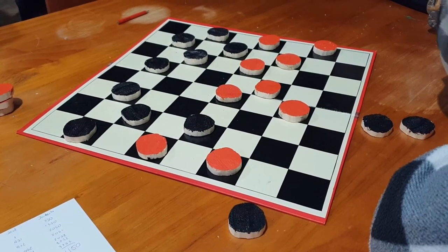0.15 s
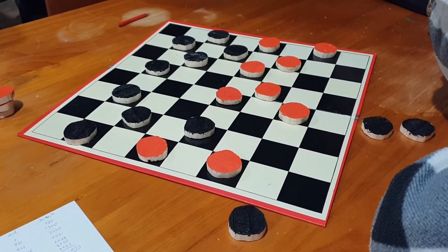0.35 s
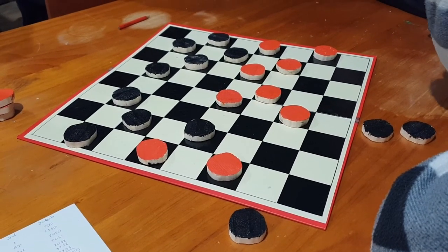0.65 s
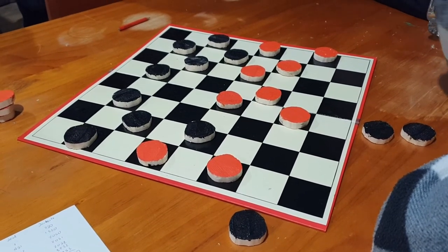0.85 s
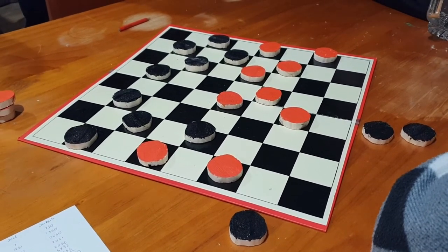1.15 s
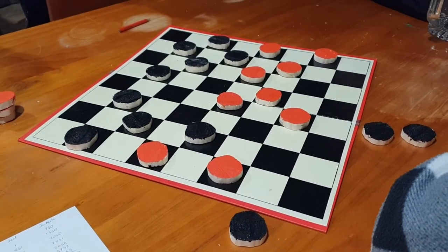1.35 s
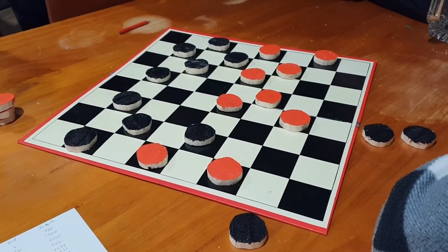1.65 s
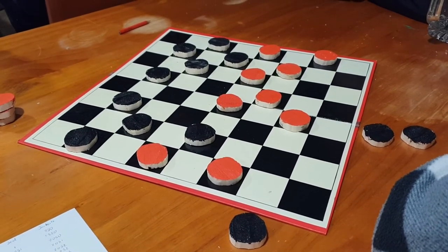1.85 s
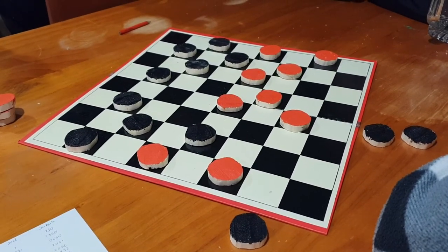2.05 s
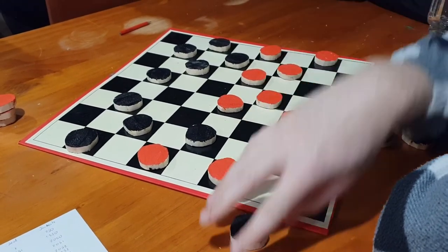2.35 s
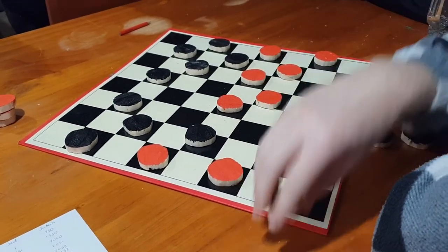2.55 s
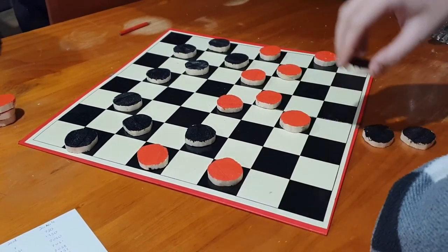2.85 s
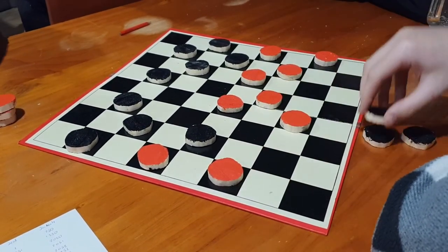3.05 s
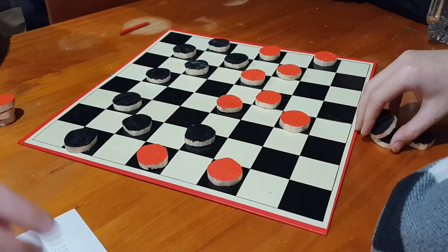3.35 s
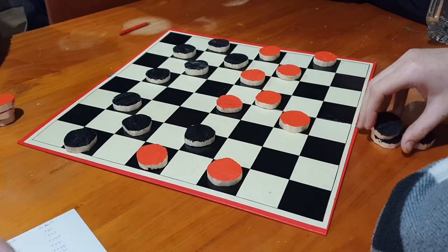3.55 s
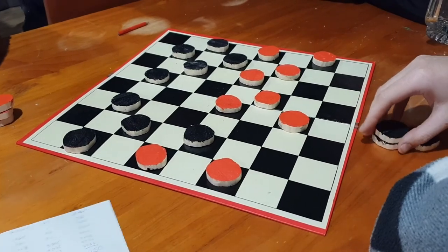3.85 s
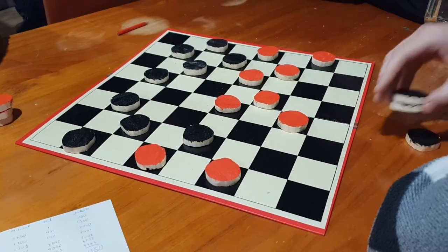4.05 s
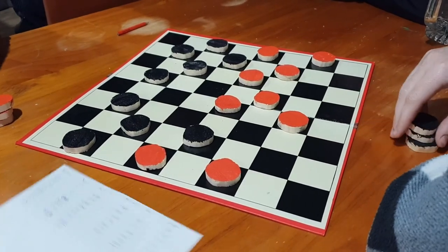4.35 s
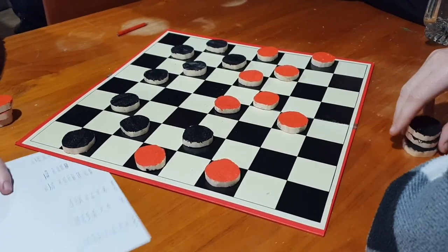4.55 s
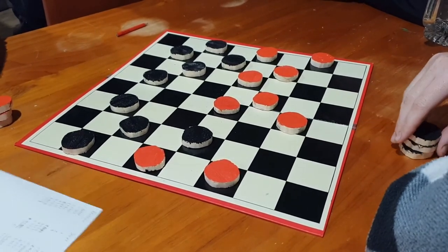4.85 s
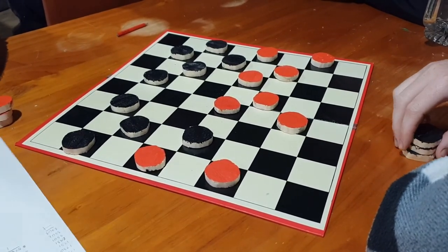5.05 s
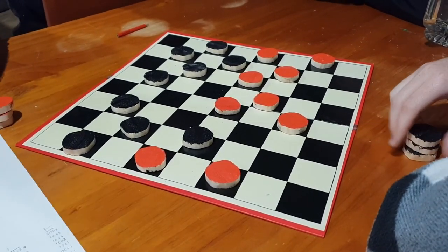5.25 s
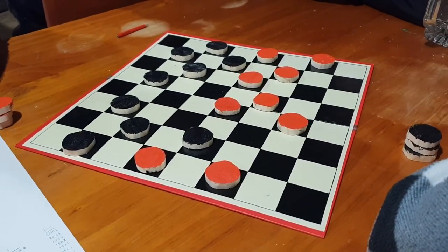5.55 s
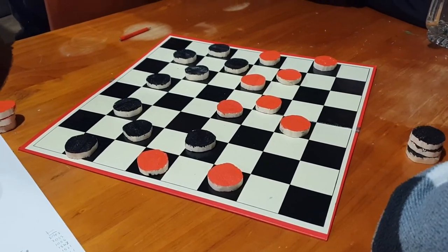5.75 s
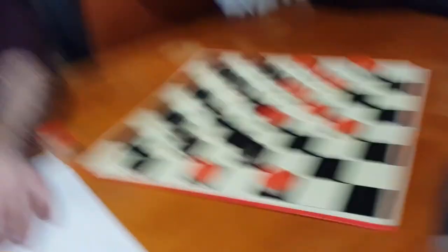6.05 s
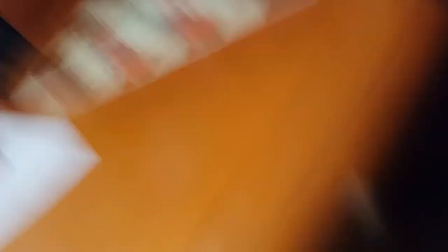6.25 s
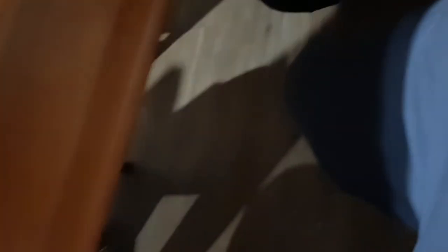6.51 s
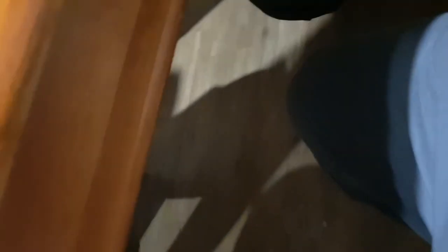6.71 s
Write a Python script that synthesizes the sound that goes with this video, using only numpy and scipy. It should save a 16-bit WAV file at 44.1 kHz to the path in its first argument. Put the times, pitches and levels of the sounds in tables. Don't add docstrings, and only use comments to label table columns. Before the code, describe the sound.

Small wooden game pieces knock together and are stacked indoors, a stiff sheet snaps and rustles, and fingers bump and rub the recorder.

```python
import sys
import numpy as np
from scipy import signal
from scipy.fft import rfft, irfft
from scipy.io import wavfile
from scipy.ndimage import uniform_filter1d

SR = 44100
rng = np.random.default_rng(int(sys.argv[2]) if len(sys.argv) > 2 else 0)


def field_ratio(decibels):
    return 10 ** (np.asarray(decibels, dtype=float) / 20)


def master_out(mix):
    frames = np.transpose(np.atleast_2d(mix))
    ceiling = np.clip(frames, -1, 1)
    pcm = np.round(ceiling * 32767).astype(np.int16)
    wavfile.write(sys.argv[1], SR, pcm)


N = 303408

# (time [s], peak level [dB], ring [Hz], crack level [dB])
FIDGET = [(0.036, -31, 2620, -28), (0.0817, -9.5, 3140, -22.5), (0.2091, -23, 3600, -35),
          (0.2142, -17, 3600, -34), (0.254, -30, 3700, -43), (0.3299, -24.5, 2400, -39),
          (0.3421, -24, 2960, -45), (0.351, -23.5, 3350, -31), (0.3655, -22.5, 2620, -36),
          (0.3736, -10.5, 3660, -30), (0.3878, -20, 6000, -32), (0.4036, -32, 2130, -45),
          (0.4146, -25, 2700, -40), (0.4278, -22.5, 2680, -13), (0.4508, -16, 5520, -39),
          (0.4335, -30, 2400, -45), (0.4549, -32, 5400, -40), (0.4607, -23, 5640, -43),
          (0.4645, -28, 5460, -47), (0.4682, -24, 5800, -37), (0.474, -25, 4950, -40),
          (0.4859, -29, 3000, -42), (0.4772, -20.5, 3580, -24), (0.509, -28, 5800, -38),
          (0.5308, -22.5, 5300, -38), (0.618, -7, 2800, -27), (0.839, -28, 3430, -36),
          (0.8927, -35, 3300, -50), (0.925, -36, 4260, -41), (0.97, -24.5, 2300, -38),
          (0.981, -32, 2200, -10), (0.0875, -48, 2900, -30), (1.5971, -33, 3260, -41),
          (1.167, -27.5, 5100, -31), (1.62, -29, 3900, -37), (1.699, -36, 5130, -36),
          (1.735, -31.5, 3890, -50), (1.74, -33, 5100, -38), (1.8818, -27.5, 4330, -37),
          (1.8956, -33.5, 4570, -35), (2.0717, -35, 2950, -47), (2.0939, -32, 3370, -42),
          (2.065, -30, 3640, -42), (2.1026, -28, 3870, -40)]
# (time [s], peak level [dB], ring [Hz], crack level [dB])
STACKING = [(2.692, -45, 5530, -29), (2.7055, -13, 5560, -33), (2.697, -43, 5650, -30),
            (2.7355, -17, 6000, -39), (2.739, -20, 6000, -41), (2.7455, -13.5, 3900, -52),
            (2.755, -12, 6040, -25), (2.7613, -9.5, 3670, -59), (2.7671, -10, 3900, -55),
            (2.771, -24, 3120, -45), (2.7784, -15.5, 3650, -26), (2.7827, -14.5, 3800, -47),
            (2.7865, -19, 4080, -45), (2.7983, -26, 3850, -42), (3.891, -34, 4870, -53),
            (4.2504, -30, 5030, -20), (4.264, -28, 5470, -23), (4.3231, -14, 5700, -31),
            (4.341, -27, 4670, -23), (4.348, -29, 4140, -35), (4.355, -27, 4850, -35),
            (4.4142, -29, 4970, -35), (4.3766, -16, 4700, -48), (4.3914, -17.5, 4150, -24.5),
            (4.409, -26, 5530, -33)]
FIDGET_PAN_DB, STACK_PAN_DB, PAN_DB_PER_OCTAVE = 4, 0, -5.5
HOLLOW_HZ, HOLLOW_DB, HOLLOW_T60_S = 2690, -33.5, 0.54

# (time [s], peak level [dB], ring [Hz], edge level [dB])
KNOCKS = [(0.08, -28, 444, 2), (0.21, -23, 1730, 16.5), (0.331, -31, 1800, -36), (0.374, -20.5, 1700, 7.5),
          (0.478, -29.5, 1720, 13), (0.97, -27, 1260, 14), (1.638, -32, 754, -9), (2.1, -36, 1420, -28),
          (2.443, -31.5, 810, -14.5), (2.52, -40.5, 1380, -36), (2.764, -22.5, 1700, 12),
          (2.774, -26, 520, -20), (3.03, -32, 690, -3.5), (3.103, -22.5, 1800, 4.5),
          (3.118, -29.5, 700, -22), (3.6225, -19, 1210, 0), (3.6453, -23, 525, -41),
          (3.873, -32, 1370, -13), (4.028, -30, 606, -12), (4.126, -33.5, 595, -32), (4.199, -17, 800, -9),
          (4.555, -33, 593, -30), (4.585, -28, 970, -33), (4.674, -34, 1630, -21), (4.9, -30, 1750, -18),
          (5.197, -36.5, 745, -19), (5.465, -22.5, 1180, 1), (5.671, -43.5, 900, -43)]
# (time [s], peak level [dB], ring [Hz])
BUMPS = [(0.099, -40.5, 48), (0.642, -36.5, 57.6), (1.08, -34, 111), (1.203, -36, 128), (2.39, -33, 172),
         (2.62, -34.5, 374), (3.653, -32.5, 197), (4.132, -32.5, 194), (4.47, -29.5, 135), (4.58, -33, 136),
         (5.066, -29, 293), (5.194, -35, 101), (5.464, -28, 400), (5.523, -25.5, 181), (5.765, -30, 135)]
# (frequency [Hz], level [dB], t60 [s])
BOARD_MODES = [(603, -12.5, 0.08), (750, -0.5, 0.04), (1010, -13, 0.11), (1448, 0.5, 0.081),
               (1700, -1.5, 0.073), (1965, -2, 0.029), (2800, 7.5, 0.023), (3600, 17.5, 0.059)]
BOARD_DB, BOARD_TILT_DB = -17.5, 11
# (time [s], shuffle level [dB], hold [s])
SHUFFLE = [(0.0, -48.5, 0.014), (0.25, -54, 0.0088), (0.375, -42, 0.01), (0.42, -46, 0.088),
           (0.66, -50.5, 0.22), (0.85, -48.5, 0.36), (1.15, -45.5, 0.13), (1.645, -45, 0.071),
           (2.105, -51, 0.0025), (2.78, -42, 0.0027), (3.13, -42, 0.0034)]
PUSH_RISE_DB_S, PUSH_FALL_DB_S = 167, 175
# (frequency [Hz], level [dB per Hz])
SHUFFLE_COLOUR = [(500, -1.5), (900, -3.5), (1400, -1.5), (3200, -8), (6000, -17.5), (10000, -67)]

# (time [s], peak level [dB], ring [Hz])
SNAPS = [(4.5027, -26.5, 5500), (4.582, -31, 4400), (4.6016, -46, 4180), (4.656, -20, 6060),
         (4.6653, -21, 6130), (4.675, -14.5, 5600), (4.6837, -44, 4860), (4.689, -25, 5800),
         (4.693, -23, 4080), (4.7027, -40, 5000), (4.8052, -25, 4900), (4.814, -27, 5700),
         (4.8305, -15.5, 5500), (4.851, -18, 4300), (4.8715, -34, 3630), (4.8808, -16, 4870),
         (4.8936, -16, 5000), (4.9006, -4.5, 3930), (4.9065, -2.5, 4160), (4.912, -10, 3330),
         (4.919, -14, 3380), (4.9239, -26, 3400), (4.9285, -44, 3350), (5.0284, -27, 4050),
         (5.0418, -17, 3930), (5.047, -28, 3600), (5.0526, -14.5, 3200), (5.062, -27, 3130),
         (5.068, -43, 3400), (5.0893, -4, 4700), (5.0945, -4.5, 4800), (5.101, -7.5, 6050),
         (5.106, -13, 5900), (5.12, -36, 4200), (5.124, -14.5, 4200), (5.1342, -23, 4200),
         (5.1423, -18.5, 5400), (5.1506, -17, 4860), (5.1602, -22, 4600), (5.169, -30, 5900),
         (5.173, -16.5, 4260), (5.1788, -19, 5100), (5.1886, -21.5, 5140), (5.2488, -24.5, 4500),
         (5.279, -23, 4530), (5.306, -23.5, 6850), (5.323, -19.5, 4970), (5.331, -32, 5900),
         (5.344, -28, 4950), (5.3513, -12, 4860), (5.3571, -13, 4900), (5.3648, -12.5, 4750),
         (5.3765, -26, 4900), (5.398, -28, 5030), (5.411, -37, 4750),
         (5.455, -36, 5050), (5.4584, -24, 5000), (5.4671, -27, 8000), (5.4864, -17.5, 3600),
              (5.495, -13.5, 5000), (5.5, -21, 3670), (5.5228, -22, 3780), (5.5323, -25, 6400),
              (5.5386, -23, 5460), (5.5443, -16.5, 5440), (5.5475, -21, 5500), (5.5518, -11, 3300),
              (5.562, -15, 5560), (5.567, -13, 5700), (5.574, -17.5, 5600), (5.5814, -18, 5660),
              (5.5885, -10.5, 5040), (5.5935, -23, 4780), (5.701, -27, 5370), (5.7135, -21.5, 5940),
              (5.7318, -22, 5850), (5.747, -25, 5370), (5.763, -34, 5470), (5.7745, -29.5, 5900),
              (5.783, -15, 5550), (5.7914, -14, 5070), (5.793, -8, 4400), (5.807, -25, 5300),
              (5.8148, -11, 4130), (5.821, -21, 7900), (5.828, -21, 7540), (5.852, -23, 5400),
              (5.8923, -27, 5360), (5.9102, -15, 4400), (5.9152, -19, 5200), (5.9235, -22.5, 5800),
              (5.9425, -26, 5750), (5.951, -22, 5800), (5.964, -26, 3650), (5.9807, -21.5, 5570),
              (5.9876, -27, 5600), (5.9988, -40, 5450), (6.016, -9.5, 5010), (6.0249, -15.5, 5650),
              (6.03, -21, 5550), (6.0378, -8.5, 5100), (6.0429, -11, 5500), (6.0498, -25.5, 4760),
              (6.0538, -34, 5400), (6.0643, -39, 4850), (6.1354, -39.5, 4900), (6.1966, -20, 5300),
              (6.201, -33.5, 7350), (6.2053, -22, 6230), (6.212, -22.5, 6000), (6.2168, -28.5, 4700),
              (6.241, -23, 6200), (6.2456, -17, 5130), (6.428, -27, 4460), (6.77, -38.5, 5400),
         (6.254, -21, 4270),
    (6.2785, -17, 5600),
    (6.2854, -16, 5500),
    (6.2932, -17, 4700),
    (6.3007, -28, 4420),
    (6.6866, -38, 4480),
    (6.803, -34, 3560),
]
# (time [s], crackle level [dB])
BENDING = [(4.25, -46), (4.326, -36), (4.583, -40), (4.671, -30.5), (4.823, -35.5), (4.905, -35.5),
           (5.04, -34), (5.094, -39), (5.15, -37), (5.344, -30.5), (5.467, -36), (5.548, -31.5),
           (5.71, -37), (5.785, -28), (5.913, -35.5), (6.017, -32.5), (6.201, -35.5), (6.277, -39),
           (6.543, -62), (6.685, -60), (6.78, -60.5)]
BEND_RISE_DB_S, BEND_HOLD_S, BEND_FALL_DB_S = 1383.5, 0.015, 309
# (frequency [Hz], level [dB per Hz])
CRACKLE_COLOUR = [(1200, -14), (2600, 3), (3200, 6), (6000, 2.5), (7500, -8), (9500, -17), (13500, -32),
                  (16000, -26.5)]
# (frequency [Hz], level [dB])
NEAR_SIDE = [(1000, -5.5), (2400, 5), (4400, 3), (8000, -9), (15000, 5)]
# (time [s], left-right level [dB])
TURNING = [
    (5.3, 1.5),
    (5.55, 1.5),
    (5.95, 2),
    (6.1, -4),
    (6.19, 1),
    (6.265, 16),
    (6.28, -4),
    (6.45, 4.5),
]
SHEET_LOW_HZ = 2700

# (time [s], hiss level [dB], hold [s])
SLIDING = [(0.42, -69, 0.21), (0.95, -65.5, 0.32), (2.72, -60, 0.079), (3.1, -61, 0.16), (3.57, -68, 0.19),
           (3.745, -57, 0.065), (4.11, -48.5, 0.32), (4.55, -51, 0.35), (4.95, -54, 0.22), (5.5, -60, 0.06),
           (5.75, -79, 0.32), (6.19, -55, 0.075), (6.52, -52.5, 0.037), (6.77, -63.5, .04)]
SLIDE_RISE_DB_S, SLIDE_FALL_DB_S, SLIDE_REST_DB = 208.5, 148, -100
# (frequency [Hz], level [dB per Hz])
SLIDING_COLOUR = [(4000, -2), (7500, -6.5), (9000, -14.5), (11000, -5.5), (14000, -12), (15800, -8),
                  (16800, -30)]

# (time [s], peak level [dB], contact [ms], scuff level [dB])
THUMPS = [
    (5.9996, -2, 0.64, -44),
    (6.1764, 1.5, 2.03, 1),
    (6.1804, -8, 1.18, -19),
    (6.2544, -10, 2.8, 4),
    (6.26, 0.5, 3.5, -2),
    (6.333, -16, 2.9, -14),
    (6.2656, -12.5, 3.2, 0),
    (6.395, -15.5, 9.2, -17),
    (6.579, -17.5, 2.3, -16),
    (6.6646, -23.5, 0.37, -4),
]
# (time [s], peak level
# [dB], contact [ms], scuff level [dB])
PULLS = [
    (6.542, -26, 1.56, -23),
    (6.0012, -7, 2.55, -40),
    (6.606, -23.5, 3.1, -24),
    (6.647, -20, 3.9, -21),
]
# (time [s], rumble level [dB], scuff level [dB])
GRIP = [
    (5.78, -51.5, -71),
    (5.9, -71, -46),
    (6.005, -39, -35),
    (6.18, -47, -36.5),
    (6.265, -33, -33.5),
    (6.41, -36, -32.5),
    (6.66, -52.5, -58),
    (6.87, -54.5, -72.5),
]
GRIP_RISE_DB_S, GRIP_FALL_DB_S = 278, 353
# (time [s], peak level [dB])
TICKS = [(6.378, -37), (6.3867, -33), (6.389, -30), (6.3962, -15.5), (6.4126, -42), (6.426, -50),
         (6.4453, -48), (6.4937, -42), (6.507, -36.5), (6.7305, -65), (6.5223, -36), (6.546, -28),
         (6.5635, -46), (6.5702, -33), (6.5795, -40), (6.6047, -47), (6.6257, -49), (6.6335, -54),
         (6.6475, -34), (6.6655, -30),
         (6.177, -15.5),
    (6.1807, -20),
    (6.482, -50),
    (6.617, -46),
    (6.6225, -49),
]
TICK_HZ, TICK_GAIN_DB, TICK_RIGHT_DB = (900, 6000), 5, -35
# (time [s], left level [dB], right level [dB])
COVER = [
    (0, 0, -6.5),
    (6.68, 2.5, -3.5),
    (6.7, -39, -11),
    (6.76, -2, -14),
    (6.8, -6, -11),
    (6.88, -5, -9),
]
# (frequency [Hz], level [dB])
SHADOW = [(100, -4), (500, -3.5), (1300, -7), (2400, -2.5), (4400, -8.5), (8000, -16), (15000, -15)]

# (frequency [Hz], t60 [s], level [dB])
REVERB = [(148, 0.093, -20), (587, 0.4, -11.5), (1420, 0.3, -8.5), (2750, 0.41, -15.5), (3900, 0.27, -13),
          (5530, 0.48, -16), (9100, 0.3, -14.5), (14000, 0.3, -15.5)]
# (time [s], level [dB])
STIR = [(0.3, 8.5), (0.44, 13.5), (0.6, 5), (2.05, 4.5), (2.6, 2.5), (2.9, 4), (3.54, 1.5), (3.58, 9),
        (3.7, 10), (3.92, 4), (4.6, 6), (5.38, 1.5), (5.555, 3.5), (5.945, 6), (6.295, 5.5), (6.465, 0.5),
        (6.66, -1.5)]
ROOM_LOW_DB, ROOM_MIDDLE_DB, LOW_FOLLOWS = -48.5, -53, 0.56
# (frequency [Hz], level [dB per Hz])
ROOM_COLOUR = [(25, -13), (60, -3.5), (330, -4.5), (700, -25.5), (2950, -28), (3600, -38.5), (6100, -41.5),
               (7600, -55.5)]
# (frequency [Hz], left-right likeness [0-1])
LIKENESS = [(60, 0.8), (240, 1), (950, 0.046), (3770, 0.032), (15000, 0.01)]
# (time [s], level [dB])
HUM = [
    (0.0, -48),
    (6.43, -54),
    (6.6, -60),
]
HUM_HZ = 79.9


def in_time(rows, outside=None):
    s, *columns = np.transpose(rows)
    return [np.interp(np.arange(N) / SR, s, c, outside, outside) for c in columns]


def at_hz(points, hz, axis=1):
    points = np.array(points)
    return np.interp(np.log(np.maximum(hz, 1)), np.log(points[:, 0]), points[:, axis])


def rms_one(x):
    return x / np.sqrt(np.mean(x ** 2) + 1e-20)


def band(x, low_hz, high_hz):
    return signal.sosfilt(signal.butter(2, [low_hz, min(high_hz, .45 * SR)], "band", fs=SR, output="sos"), x)


def coloured(x, points):
    return irfft(rfft(x) * field_ratio(at_hz(points, np.fft.rfftfreq(N, 1 / SR))), N)


def resonance(x, hz, width_hz):
    r = np.exp(-np.pi * width_hz / SR)
    poles = [1, -2 * r * np.cos(2 * np.pi * hz / SR), r * r]
    return signal.lfilter([(1 - r * r) / 2, 0, (r * r - 1) / 2], poles, x)


def drift(rate):
    r = np.exp(-40 * np.pi * rate / SR)
    slow = signal.lfilter([1], [1, -2 * r, r * r], rng.standard_normal(N // 20 + 2002))[2000:]
    return np.interp(np.arange(N) / 20, np.arange(len(slow)), rms_one(slow))


def stereo_noise():
    alike = np.clip(at_hz(LIKENESS, np.fft.rfftfreq(N, 1 / SR)), 0, 1)
    mid, side = rfft(rng.standard_normal((2, N)))
    return irfft(np.sqrt(1 + alike) * mid + np.sqrt(1 - alike) * side * [[1], [-1]], N)


def add(out, s, hit, peak_db, pan_db, lag_per_db=2.5):
    hit = hit / np.abs(hit).max() * field_ratio(peak_db)
    lag = np.clip(lag_per_db * pan_db, -20, 20)
    for channel, sign in enumerate((1, -1)):
        start = max(round(s * SR - sign * lag / 2), 0)
        part = hit[:N - start]
        out[channel, start:start + len(part)] += part * field_ratio(sign * pan_db / 2)


def shade(x, points):
    half = np.array(points) * [1, .5]
    return np.array([coloured(x[0], half), coloured(x[1], half * [1, -1])])


def dying(t60, rise=0.0001, size=2048):
    t = np.arange(size) / SR
    return rng.standard_normal(size) * field_ratio(-60 * t / t60) * (1 - np.exp(-t / rise)) ** 2


def grains(per_s, spread_db, clumps_per_s):
    sizes = field_ratio(spread_db * np.minimum(rng.exponential(1, N), 5)) * rng.standard_normal(N)
    chance = per_s * field_ratio(6.0 * drift(clumps_per_s)) / SR
    return rms_one(sizes * (rng.random(N) < chance))


def crackle(pitches_hz, per_s, t60):
    fade = field_ratio(-60 / t60 / SR)
    out = 0
    for hz in pitches_hz:
        contacts = np.abs(grains(per_s / len(pitches_hz), 3.6, 30))
        bursts = signal.lfilter([1], [1, -fade], contacts)
        out = out + rms_one(resonance(bursts * rng.standard_normal(N), hz, 0.61 * hz)) / np.sqrt(hz)
    effort = uniform_filter1d(out ** 2, size=2600) + 1e-12
    return rms_one(out / effort ** .35)


def strokes(rows, rise_db_s, fall_db_s, column=1, held=None):
    t, level = np.arange(N) / SR, np.full(N, -120.)
    for row in rows:
        end = row[0] + (abs(row[held]) if held else 0)
        before, after = np.maximum(row[0] - t, 0), np.maximum(t - end, 0)
        level = np.maximum(level, row[column] - rise_db_s * before - fall_db_s * after)
    return level


def clicks():
    out = np.zeros((2, N))
    fidget = [(*c, FIDGET_PAN_DB) for c in FIDGET]
    stacking = [(*c, STACK_PAN_DB) for c in STACKING]
    for s, peak_db, hz, crack_db, pan_db in fidget + stacking:
        contact = 0.08 * dying(0.019)
        contact[8] += 1
        body = band(contact, 900, 5000)
        ring = band(3.0 * resonance(contact, hz, 0.25 * hz) + 0.4 * body, 860, 7300)
        crack = band(contact, 5300, 14400)
        hit = ring / np.abs(ring).max() + field_ratio(crack_db + 17.5) * crack / np.abs(crack).max()
        add(out, s, hit, peak_db, pan_db + PAN_DB_PER_OCTAVE * np.log2(hz / 3500))
    for s, peak_db, hz, _ in FIDGET:
        if peak_db > -12:
            hollow = resonance(dying(HOLLOW_T60_S, rise=0.00043, size=12000), HOLLOW_HZ, 460)
            add(out, s, hollow, peak_db + HOLLOW_DB, 0)
    return out


def knocks():
    out = np.zeros((2, N))
    for s, peak_db, hz, edge_db in KNOCKS:
        contact = dying(0.092, size=4096)
        contact[12] += 2.5
        wood = 4.0 * resonance(contact, hz, 0.47 * hz) + 0.8 * band(contact, 390, 4350)
        edge = field_ratio(edge_db) * band(band(contact, 2200, 5200), 1500, 6500)
        wood = wood + field_ratio(BOARD_DB) * np.abs(wood).max() * table_top(contact, hz) * 2
        hit = band(band(wood, 170, 2430), 100, 4500) + edge
        add(out, s, hit, peak_db, -2.5, lag_per_db=7.3 * (2.9 < s < 4.4))
    return out + bumps() + shuffling()


def table_top(contact, hz):
    tap = contact * field_ratio(-60 * np.arange(len(contact)) / SR / 0.015)
    out = 0
    for (mode_hz, db, t60), luck in zip(BOARD_MODES, rng.standard_normal(len(BOARD_MODES))):
        mode = resonance(tap, mode_hz, np.log(1000) / np.pi / t60)
        mode_db = db + 4.9 * luck - BOARD_TILT_DB * abs(np.log2(mode_hz / hz))
        out = out + field_ratio(mode_db) * mode / np.abs(mode).max()
    return out


def bumps():
    out = np.zeros((2, N))
    for s, peak_db, hz in BUMPS:
        push = dying(0.28, rise=0.0039, size=8192)
        push[:100] += 0.65 * np.hanning(100)
        add(out, s, resonance(band(push, 21, 860), hz, 0.41 * hz), peak_db, 1.5)
    return out


def shuffling():
    rough = crackle([800, 1580, 2400, 4260], 1800, 0.023)
    shuffle = coloured(rough + 0.97 * stereo_noise(), SHUFFLE_COLOUR)
    level_db = strokes(SHUFFLE, PUSH_RISE_DB_S, PUSH_FALL_DB_S, held=2) - 3.5
    return field_ratio(level_db) * rms_one(shuffle)


def paper():
    out = np.zeros((2, N))
    for s, peak_db, hz in SNAPS:
        snap = dying(0.014)
        snap[6] += 5.5
        hit = resonance(snap, hz, 0.037 * hz) + 0.22 * band(snap, 3070, 6150) + 0.082 * snap
        pan_db = 1.7 * snap[-1] / abs(snap[-2:]).max()
        add(out, s, band(hit, 880, 11300), peak_db - 2.5, pan_db)
    rough = crackle([3300, 4400, 5800, 8000, 12000], 2200, 0.005)
    fine = rms_one(coloured(rough + 0.5 * stereo_noise(), CRACKLE_COLOUR))
    bends = [(*b, BEND_HOLD_S) for b in BENDING]
    bend_db = strokes(bends, BEND_RISE_DB_S, BEND_FALL_DB_S, held=2) - 2.5
    out = shade(out + field_ratio(bend_db) * fine, NEAR_SIDE)
    high = signal.sosfilt(signal.butter(6, SHEET_LOW_HZ, "high", fs=SR, output="sos"), out)
    out = 1.22 * resonance(out, 1350, 510) + high
    out = out * field_ratio(in_time(TURNING)[0] * [[.5], [-.5]])
    return np.array([out[0], np.roll(out[1], 9)])


def sliding():
    hiss = rms_one(coloured(stereo_noise(), SLIDING_COLOUR))
    level_db = np.maximum(strokes(SLIDING, SLIDE_RISE_DB_S, SLIDE_FALL_DB_S, held=2), SLIDE_REST_DB)
    return field_ratio(level_db - 7.0 + 1.7 * drift(8.5)) * hiss * field_ratio([[-4], [2]])


def handling():
    out, ms = np.zeros((2, N)), np.arange(4096) / SR * 1000
    for way, s, peak_db, contact_ms, scuff_db in [(-1, *f) for f in THUMPS] + [(1, *f) for f in PULLS]:
        swing = 4.97 * np.log(1 + ms / contact_ms)
        onset = np.sqrt(1 - np.exp(-ms / contact_ms))
        decay = (1 + ms / contact_ms) ** -.9 * np.exp(-ms / 15)
        push = way * np.sin(swing) * onset * decay
        scuff = band(dying(0.016, size=4096), 280, 1400 / contact_ms + 600)
        hit = push / np.abs(push).max() + field_ratio(scuff_db) * scuff / np.abs(scuff).max()
        add(out, s, hit, peak_db, 0)
    rumble_db, scuff_db = [strokes(GRIP, GRIP_RISE_DB_S, GRIP_FALL_DB_S, column=k) for k in (1, 2)]
    rumble = rms_one(band(rng.standard_normal(N), 7.8, 128) * field_ratio(4.4 * drift(29)))
    scuff = band(crackle([500, 910, 1800, 3600], 2700, 0.0067), 280, 5900)
    rubbing = field_ratio(rumble_db + 13.5) * rumble + field_ratio(scuff_db - 0.5) * scuff
    return (out + rubbing) * field_ratio([[0], [-36]]) + ticks()


def ticks():
    out = np.zeros((2, N))
    for s, peak_db in TICKS:
        release = 0.13 * dying(0.01, size=512)
        release[4] += rng.choice([-1, 1])
        hit = band(band(release, *TICK_HZ), 540, 4100) + 0.12 * band(release, 10700, 11500)
        add(out, s, hit, peak_db + TICK_GAIN_DB, 0)
    return out * field_ratio([[0], [TICK_RIGHT_DB]])


def room(x):
    t = np.arange(SR) / SR
    build = 1 - np.exp(-(t / .005) ** 2)
    tail, edges = 0, 90 * 2 ** np.arange(0, 8.1, .5)
    for low, high in zip(edges, edges[1:]):
        hz = np.sqrt(low * high)
        fade = field_ratio(at_hz(REVERB, hz, axis=2) - 60 * t / at_hz(REVERB, hz)) * build
        tail = tail + fade * band(rng.standard_normal((2, SR)), low, high)
    return 0.094 * signal.fftconvolve(x.mean(0)[None], tail, axes=1)[:, :N]


def ambience():
    stir_db = in_time(STIR)[0]
    low_db, middle_db = ROOM_LOW_DB + LOW_FOLLOWS * stir_db, ROOM_MIDDLE_DB + stir_db
    air = band(coloured(stereo_noise(), ROOM_COLOUR), 25, 18000)
    low = signal.sosfilt(signal.butter(2, 450, fs=SR, output="sos"), air)
    low = low + 0.88 * resonance(low, 226.0, 75) + .5 * resonance(low, 104.0, 38)
    high = signal.sosfilt(signal.butter(2, 450, "high", fs=SR, output="sos"), air)
    phase = 2 * np.pi * np.cumsum(HUM_HZ + 0.86 * drift(3.27)) / SR
    hum = field_ratio(in_time(HUM)[0] + 2.5 + 0.5 * drift(21)) * np.sin(phase)
    uneven_db = 1.5 * drift(8)
    return field_ratio(low_db + uneven_db) * rms_one(low) + field_ratio(middle_db + uneven_db) * rms_one(high) + hum


def scene():
    wood, sheet = clicks() + knocks(), paper()
    echo = room(wood + 0.89 * sheet)
    air = (echo + ambience()) * field_ratio(in_time(COVER)) + wood + sheet + sliding()
    return shade(air, SHADOW) + handling()


def low_pass(x):
    return signal.sosfilt(signal.butter(12, 16990, fs=SR, output="sos"), x)


def record(dry):
    clipped = np.clip(dry, -.94, .94)
    mix = signal.sosfilt(signal.cheby2(10, 60, 16900, fs=SR, output="sos"), clipped)
    return low_pass(mix)


dry = scene()
out = record(dry)
master_out(out)
```